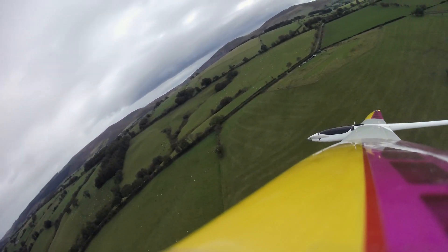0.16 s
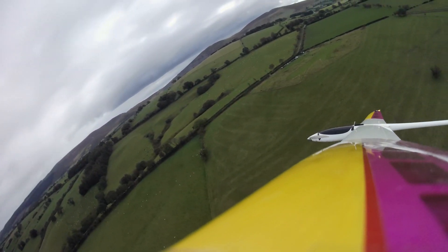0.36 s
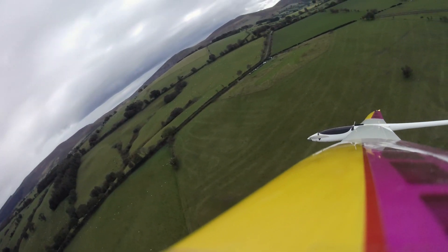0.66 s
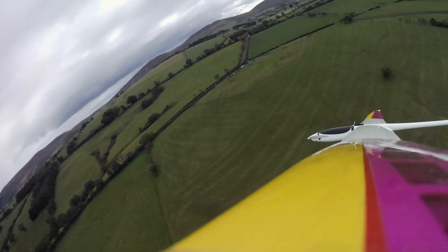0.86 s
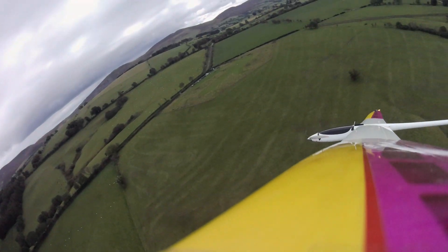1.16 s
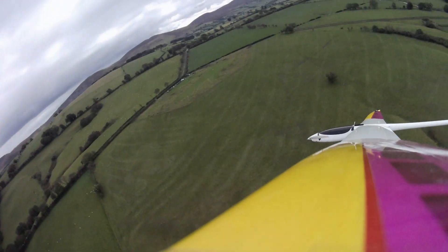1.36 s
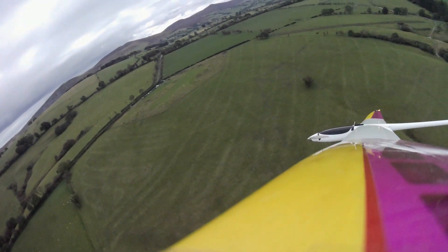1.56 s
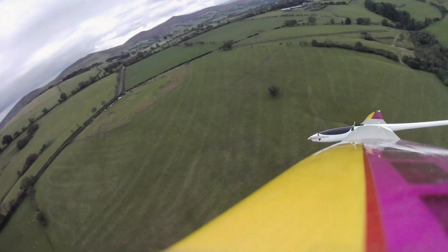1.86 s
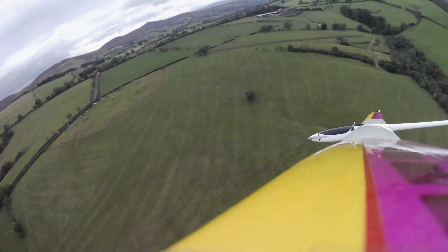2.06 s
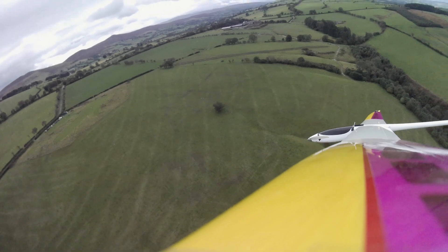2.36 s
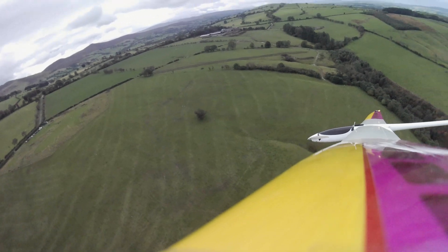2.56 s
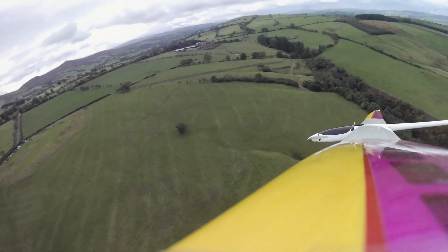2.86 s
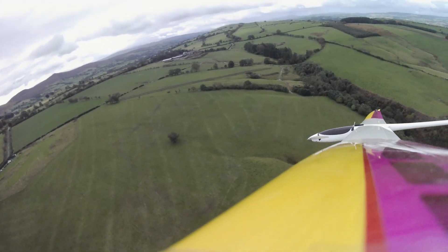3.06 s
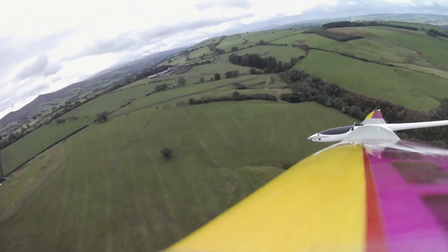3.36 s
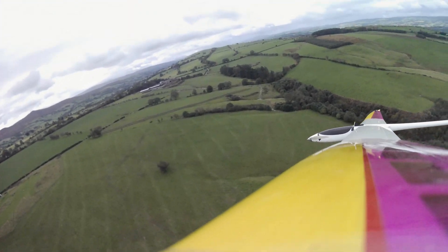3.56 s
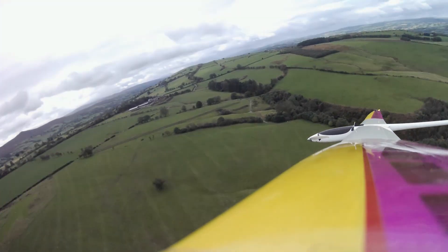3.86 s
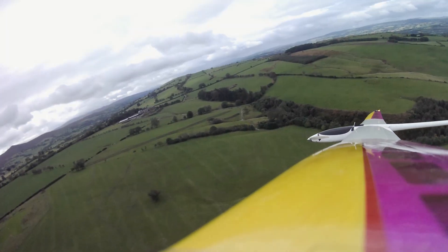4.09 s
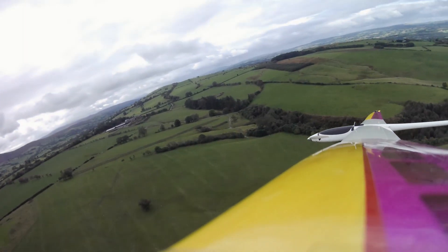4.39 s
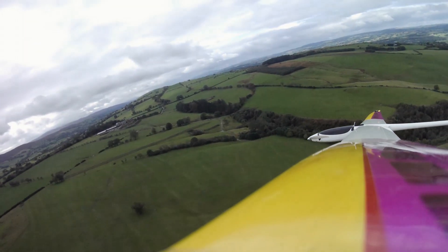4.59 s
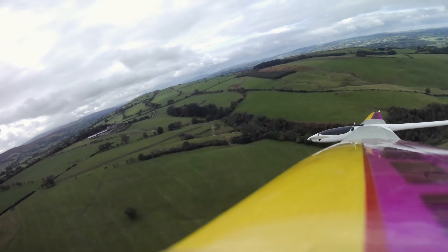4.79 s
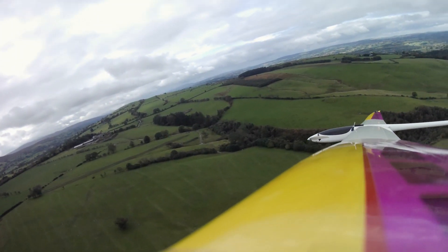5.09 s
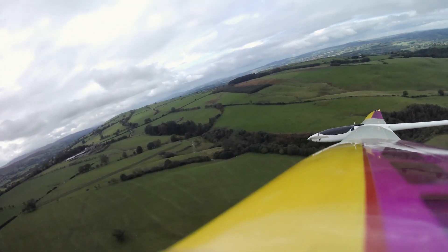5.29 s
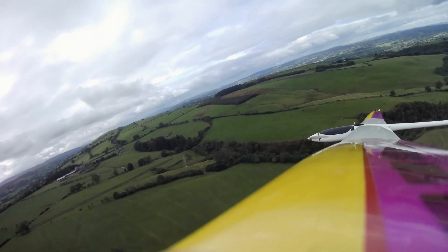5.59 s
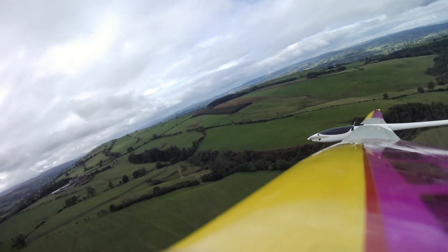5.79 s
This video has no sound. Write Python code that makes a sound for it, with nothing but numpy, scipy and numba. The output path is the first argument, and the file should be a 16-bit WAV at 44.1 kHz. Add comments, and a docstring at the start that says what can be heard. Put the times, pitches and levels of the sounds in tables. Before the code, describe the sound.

Close airflow on a small housed camera microphone mounted on a model glider outdoors. A subdued low rumble with soft hiss and a breathy, whistling resonance holds at first, with very faint brief servo whines. Then the rush gathers speed, growing louder and brighter, with low gust thumps through the second half. It peaks past four and a half seconds and eases, without stopping.

```python
"""Air rushes over a small camera on the wing of a model glider in a banked turn: steady at first, then gathering
speed, then easing off. From the start, coloured noise gives low buffeting, wake roar and boundary-layer hiss that
grow louder and brighter with the flow, while a resonance driven by noise sings breathily as a housing gap.
From a third of a second the roar swells briefly at times and a few gusts thump, each one a short damped swing of
pressure; then a faint wavering sine, the whine of what is likely a servo, comes and goes, ending before the flow peaks."""
import sys
import numpy as np
from scipy import signal
from scipy.fft import rfft, irfft
from scipy.io import wavfile
from numba import njit

SR = 44100
rng = np.random.default_rng(int(sys.argv[2]) if len(sys.argv) > 2 else 0)


def wav_record(signal):
    """Record a signal, one row per channel, as 16-bit PCM in the file named by sys.argv[1]."""
    frames = np.transpose(np.atleast_2d(signal))
    bounded = np.clip(frames, -1, 1)
    # unit amplitude maps onto the largest positive 16-bit level
    quanta = np.round(bounded * 32767).astype(np.int16)
    wavfile.write(sys.argv[1], SR, quanta)


N = 261954
TIME = np.arange(N) / SR  # s
FREQ = np.maximum(np.arange(N // 2 + 1) * SR / N, 1)  # Hz, kept off zero for the logarithms


def undb(db):
    """Definition of the decibel: level to amplitude gain."""
    return 10 ** (np.asarray(db) / 20)


def unit(x):
    """Normalization: divide by the standard deviation."""
    return x / np.std(x)


def curves(table):
    """Linear interpolation: the columns of a timed table, one value per sample."""
    seconds, *columns = np.transpose(table)
    return [np.interp(TIME, seconds, column) for column in columns]


def bell(centre_s, length_s):
    """Gaussian envelope: a smooth rise and fall, length_s wide where it has dropped to 1/e."""
    return np.exp(-np.minimum((2 * (TIME - centre_s) / length_s) ** 2, 50))


def walk(rate_hz):
    """Low-passed noise: smooth chance with spread 1 that changes about rate_hz times a second."""
    spectrum = rfft(rng.standard_normal(N // 64))
    lowpass = np.exp(-(FREQ[:N // 128 + 1] / rate_hz) ** 2)
    drift = irfft(spectrum * lowpass)
    return np.interp(TIME, np.linspace(0, TIME[-1], len(drift)), unit(drift))


def below_full(db):
    """Reference level: a flow relative to full speed, taken as its 85th percentile."""
    return db - np.percentile(db, 85)


# Strength of the airflow. Each row: time in seconds, turbulent wake in dB, smooth stream over the housing in dB.
FLOW = [(0, -30.5, -48), (0.65, -31, -48), (0.95, -31.5, -49), (1.25, -31.5, -45.5), (1.7, -28, -43.5),
        (2.25, -24.5, -40), (2.75, -23.5, -39.5), (3.6, -21.5, -36.5), (4.1, -20, -36.5), (4.6, -19, -37),
        (5.05, -21.5, -37.8), (5.94, -24, -39.5)]


def airflow():
    """Common excitation: wake and stream, in dB relative to full speed, set the levels of the flow noises."""
    wake_db, stream_db = curves(FLOW)
    return below_full(wake_db), below_full(stream_db)


def turbulence(colour, level_db, flow_db, pivot_hz, brighten, flicker_db, flicker_rate):
    """Eddy spectrum: half-octave classes flicker apart; those above the pivot fade faster in slack flow."""
    hz, db = np.transpose(colour)
    shape = undb(np.interp(np.log(FREQ), np.log(hz), db, left=-120, right=-120))
    coloured = unit(irfft(rfft(rng.standard_normal(N)) * shape, N))
    spectrum = rfft(coloured)
    half_octaves = 2 * np.log2(FREQ)
    out = 0
    for step in np.arange(np.floor(2 * np.log2(hz[0])), 2 * np.log2(hz[-1]) + 1):
        overlap = np.maximum(1 - np.abs(half_octaves - step), 0)  # triangular bands that sum to one
        band = irfft(spectrum * overlap, N)
        tilt_db = brighten * flow_db * (step / 2 - np.log2(pivot_hz))  # brighten: dB per dB and octave
        flicker = flicker_db * walk(flicker_rate)
        out = out + band * undb(level_db + flow_db + tilt_db + flicker)
    return out


# Colour of the buffeting at full speed. Each row: frequency in hertz, relative level in dB.
BUFFET_COLOUR = [(8, -7.5), (18, -2), (30, -1), (48, -0.5), (70, -2.5), (110, -7), (170, -13), (300, -32)]


def buffeting(wake_db):
    """Pseudo-sound: the largest eddies of the wake press on the microphone; 0.62 dB per dB of wake."""
    return turbulence(BUFFET_COLOUR, -22.5, 0.62 * wake_db,
                      pivot_hz=50, brighten=0.03, flicker_db=1.1, flicker_rate=8.7)


# Colour of the roar at full speed. Each row: frequency in hertz, relative level in dB.
ROAR_COLOUR = [(60, -16), (130, -0.5), (220, 0), (310, -1), (460, -4), (700, -9), (1000, -15.5),
               (1400, -20), (2000, -25), (3500, -39.5)]


def roar(wake_db, surge_db):
    """Broadband turbulence noise: the wake roars, gaining 1.12 dB per dB of wake, plus the surges."""
    return turbulence(ROAR_COLOUR, -22.5, 1.12 * wake_db + surge_db,
                      pivot_hz=328, brighten=0.32, flicker_db=0.88, flicker_rate=53)


# Colour of the hiss at full speed. Each row: frequency in hertz, relative level in dB.
HISS_COLOUR = [(600, 1.5), (1200, 1), (1800, 1.5), (3000, 0.5), (3700, -1.5), (4200, -3.5), (4800, -4),
               (5300, -5), (5700, -15.5), (6100, -26), (6500, -56.5)]


def hiss(stream_db):
    """Boundary-layer noise: small eddies of the stream hiss; 1.2 dB per dB of stream."""
    return turbulence(HISS_COLOUR, -34, 1.2 * stream_db,
                      pivot_hz=3800, brighten=0.24, flicker_db=0.54, flicker_rate=40)


# Colour of the sizzle at full speed. Each row: frequency in hertz, relative level in dB.
SIZZLE_COLOUR = [(6600, -18.5), (8200, -21.5), (8500, -4), (8900, 2), (10600, 5.5), (11800, -4.5),
                 (13000, -3.5), (14000, -22.5), (15700, -20)]


def sizzle(stream_db):
    """Boundary-layer noise: the finest eddies of the stream sizzle; 1.22 dB per dB of stream."""
    return turbulence(SIZZLE_COLOUR, -55.5, 1.22 * stream_db,
                      pivot_hz=4000, brighten=0.34, flicker_db=1.0, flicker_rate=50)


@njit
def resonate(x, hz, width):
    """Second-order resonance: a state-variable band-pass with moving centre and width in hertz."""
    y, band, low = np.empty(len(x)), 0., 0.
    for i in range(len(x)):
        g = np.tan(np.pi * hz[i] / SR)
        damping = width[i] / hz[i]
        v = (band + g * (x[i] - low)) / (1 + g * (g + damping))
        band = 2 * v - band
        low = low + 2 * g * v
        y[i] = damping * v
    return y


GAP_HZ, GAP_SAG_HZ_PER_DB = 2357, 40.5  # pitch falls where the wake outweighs the stream
GAP_WIDTH_HZ, GAP_WIDEN_DB = 900, 11  # width at full speed; twice as wide for this much more stream
GAP_DB, GAP_FOLLOW = -36, 0.58  # level at full speed, dB gained per dB of stream


def housing_gap(wake_db, stream_db, waver, low_hz, high_hz):
    """Flow-excited resonance: it broadens and swells in a faster stream, and sags in turbulent air."""
    hz = (GAP_HZ - GAP_SAG_HZ_PER_DB * (wake_db - stream_db)) * (1 + waver * walk(7.5))
    width = GAP_WIDTH_HZ * 2 ** (stream_db / GAP_WIDEN_DB)
    # only eddies about as large as the gap drive it
    eddy_band = signal.butter(5, [low_hz, high_hz], "band", fs=SR, output="sos")
    drive = signal.sosfilt(eddy_band, rng.standard_normal(N))
    breath = unit(resonate(drive, hz, width) / np.sqrt(width))
    return breath * undb(GAP_DB + GAP_FOLLOW * stream_db)


# Patches of rough air. Each row: centre in seconds, length in seconds, rise of the roar in dB.
SURGES = [(0.313, 0.064, 2), (1.362, 0.12, 3.5), (1.9, 0.044, 5), (3.532, 0.042, 3)]


def surges():
    """Level modulation: rough air swells the roar briefly; returns the rise in dB."""
    return sum(rise_db * bell(centre_s, length_s) for centre_s, length_s, rise_db in SURGES)


# The hardest gusts on the microphone. Each row: centre in seconds, level in dB of the swing before its envelope.
GUSTS = [(0.339, -19), (2.481, -13), (2.777, -12.5), (3.528, -10), (3.628, -12), (4.129, -12), (5.12, -13),
         (5.268, -14.5)]


def gusts(swing_hz, length_s):
    """Pressure impulse: a large eddy crossing the port pushes the pressure up, then sucks it down."""
    out = np.zeros(N)
    for (centre_s, db), stretch in zip(GUSTS, rng.uniform(.7, 1.3, len(GUSTS))):
        t = TIME - centre_s
        envelope = np.exp(-(t / length_s) ** 2)
        out -= undb(db) * envelope * np.sin(2 * np.pi * swing_hz * stretch * t)
    return out


# Servo moves. Each row: centre in seconds, length in seconds.
SERVO_MOVES = [(0.83, 0.13), (1.39, 0.096), (1.76, 0.098), (2.04, .12)]


def servo(whine_hz, waver):
    """Frequency modulation: short, slightly unsteady whines as a control surface is trimmed."""
    hz = whine_hz * (1 + waver * walk(25))
    tone = unit(np.sin(2 * np.pi * np.cumsum(hz) / SR))
    return undb(-51) * tone * sum(bell(centre_s, length_s) for centre_s, length_s in SERVO_MOVES)


def scene():
    """Superposition: wake noises, stream noises, thumps and whine add at one microphone."""
    wake_db, stream_db = airflow()
    buffet = buffeting(wake_db)
    wake_roar = roar(wake_db, surges())
    stream_noise = hiss(stream_db) + sizzle(stream_db)
    gap = housing_gap(wake_db, stream_db, waver=0.019, low_hz=1750, high_hz=3650)
    # passing eddies shake the roar and, more gently, the stream noise and gap together
    eddies = walk(120)
    low = buffet + wake_roar * undb(1.13 * eddies)
    high = (stream_noise + gap) * undb(0.17 * eddies)
    thumps = gusts(swing_hz=42.0, length_s=0.014)
    whine = servo(whine_hz=1626, waver=0.0041)
    return (low + high + thumps + whine)[None]


# Narrow dips in the response of the housed microphone. Each row: centre in hertz, width in hertz.
PORT_DIPS = [(4505, 750), (9800, 1120)]
TOP_HZ = 15700  # upper limit of the camera's sound


def record(dry):
    """Linear filtering: the housing cancels two narrow bands, and the camera cuts the top."""
    dips = [np.abs(FREQ - hz) / np.hypot(FREQ - hz, width / 2) for hz, width in PORT_DIPS]
    housed = irfft(rfft(dry) * np.prod(dips, axis=0), N)
    return signal.sosfilt(signal.ellip(8, .2, 70, TOP_HZ, fs=SR, output="sos"), housed)


dry = scene()
out = record(dry)
wav_record(out)
```